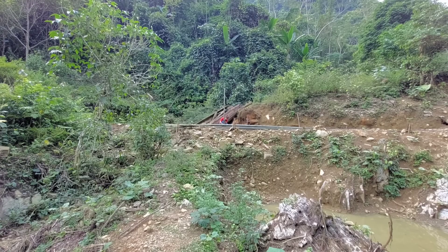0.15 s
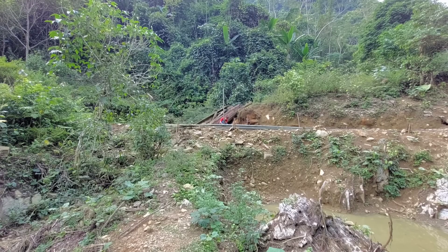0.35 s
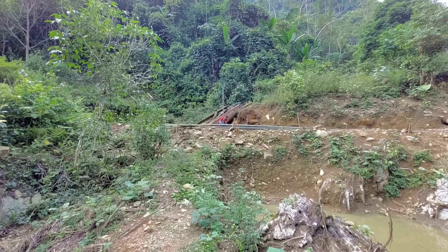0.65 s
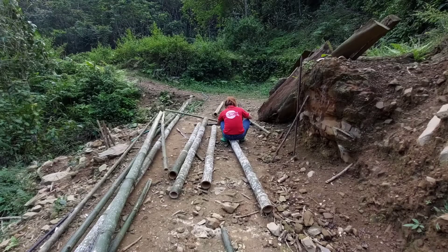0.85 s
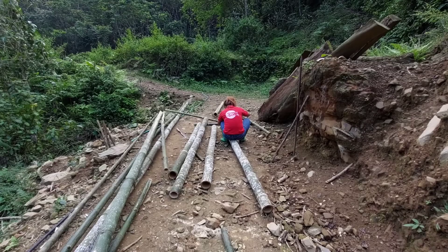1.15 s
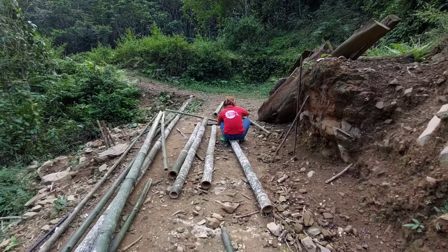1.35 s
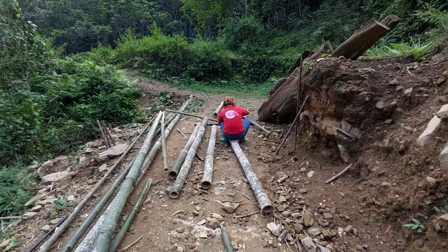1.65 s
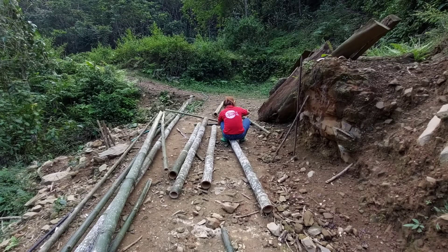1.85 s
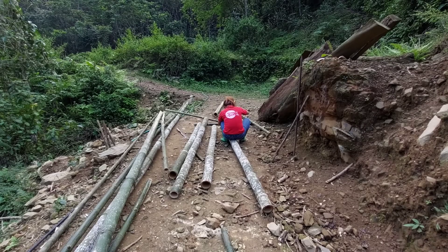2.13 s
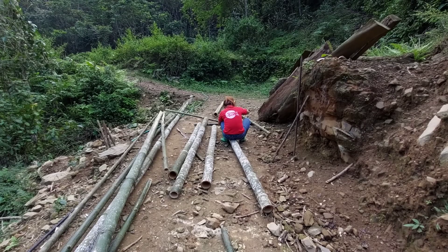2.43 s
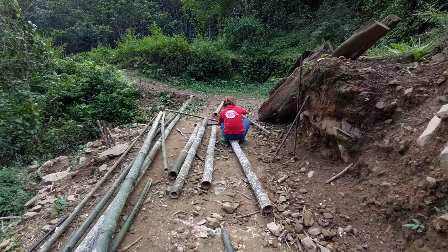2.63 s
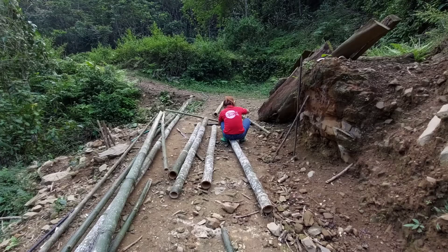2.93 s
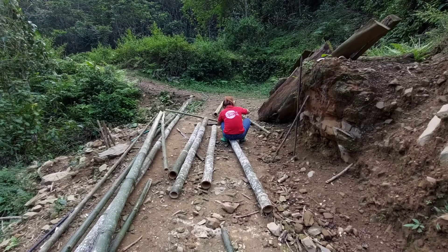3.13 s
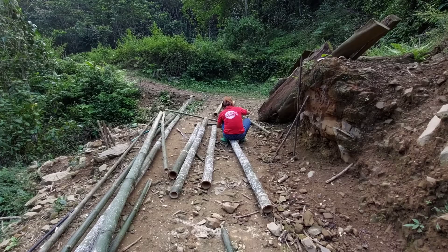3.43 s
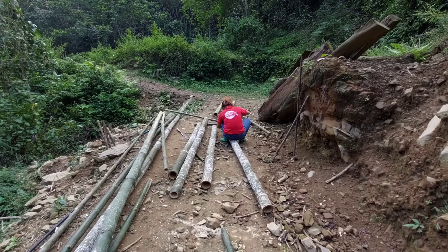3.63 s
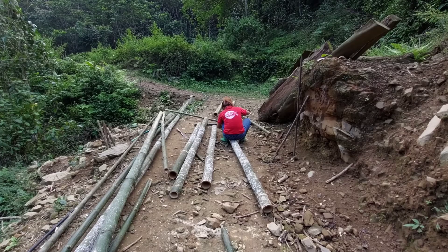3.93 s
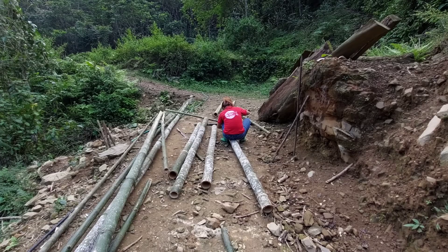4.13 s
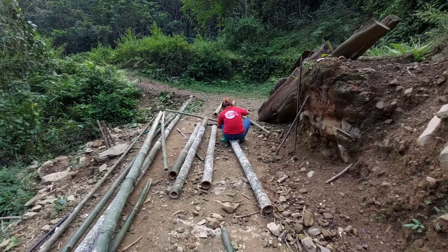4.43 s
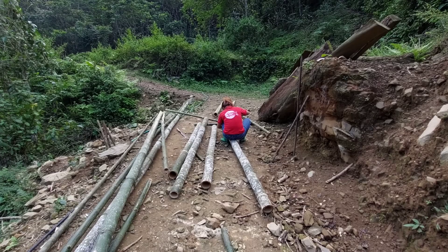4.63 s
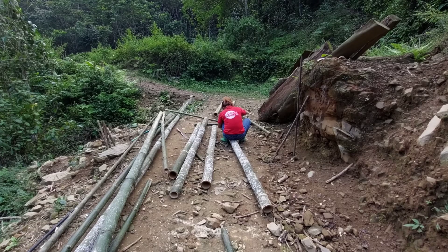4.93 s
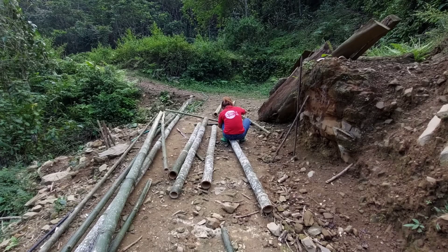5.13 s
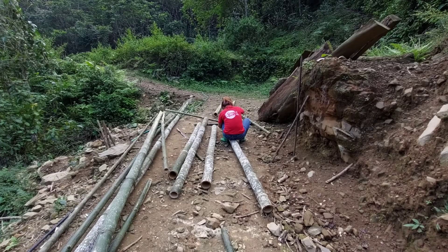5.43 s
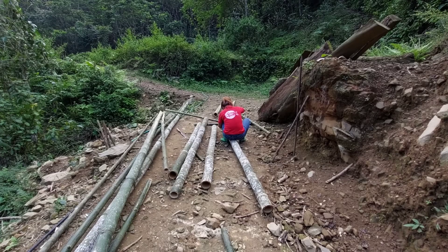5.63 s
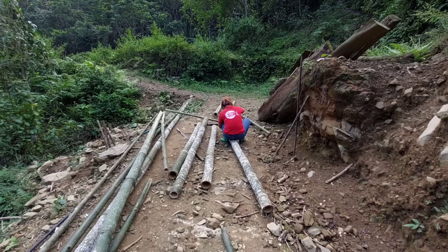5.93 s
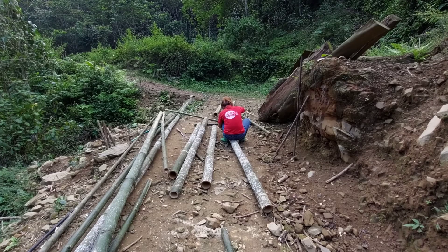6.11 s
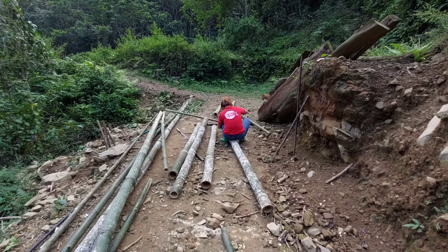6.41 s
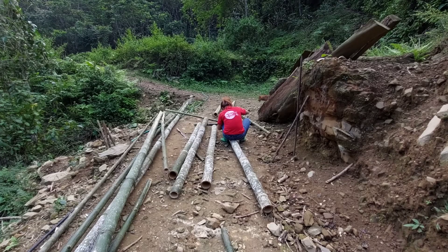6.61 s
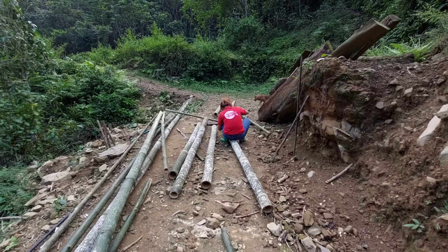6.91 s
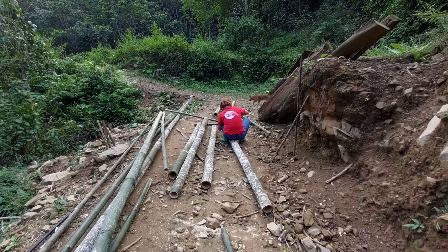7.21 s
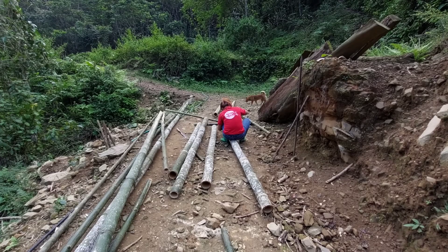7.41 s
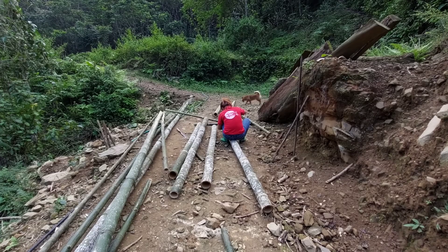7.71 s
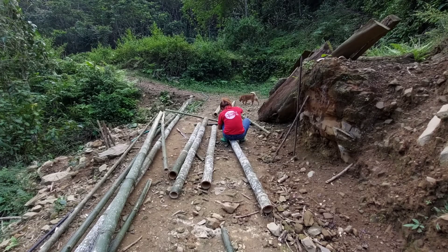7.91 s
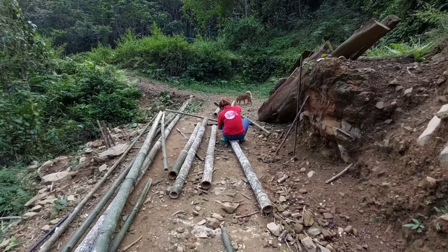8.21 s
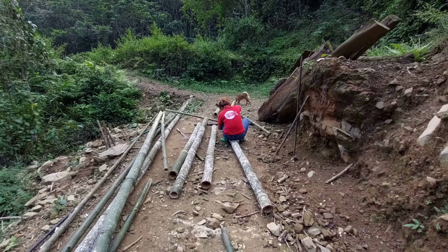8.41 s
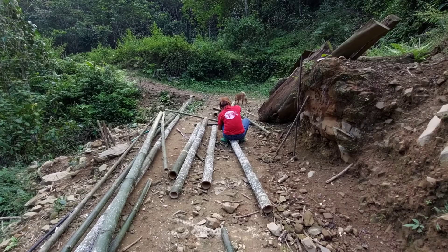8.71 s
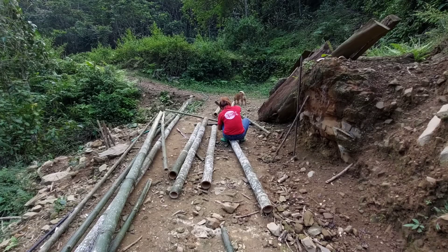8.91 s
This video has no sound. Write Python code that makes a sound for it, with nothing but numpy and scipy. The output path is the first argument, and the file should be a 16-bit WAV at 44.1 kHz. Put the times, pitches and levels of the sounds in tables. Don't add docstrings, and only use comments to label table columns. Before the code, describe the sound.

Stereo outdoor pickup from a few metres away. Stream wash and thin, high insect buzz run throughout, fuller in the first second and then softer. Irregular knocks on bamboo stand out far above them: quiet woody taps lead to gritty, sharp strokes with snapping fibres and a brief low hollow note. Small chip ticks and tool rebounds follow some hits, and the wooded slope returns a faint scattered tail. Long gaps hold only water and insects.

```python
import sys
import numpy as np
from scipy import signal
from scipy.fft import rfft, irfft
from scipy.io import wavfile
from scipy.ndimage import uniform_filter1d

SR = 44100
rng = np.random.default_rng(int(sys.argv[2]) if len(sys.argv) > 2 else 0)


def to_wav(s):
    ch = np.atleast_2d(s).T
    pcm = np.round(np.clip(ch, -1, 1) * 32767)
    wavfile.write(sys.argv[1], SR, pcm.astype(np.int16))


def amplitude_ratio(level_db):
    exponent = np.asarray(level_db, float) / 20
    return 10 ** exponent


N = 399409

# (time [s], wall peak [dB], wood level [dB], crack level over the wall [dB],
# spot on the wall [0-1])
BLOWS = [
    (1.713, -33, -13, -32, 0.11),
    (1.981, -30.5, -4, -39, 0.46),
    (2.438, -9, -12.5, -26.5, 0.18),
    (2.927, -5.5, -9.5, -15.5, 0.1),
    (5.153, -33, -8, -23, 0.08),
    (5.717, -9.5, -9.5, -25.5, .07),
    (6.231, -5.5, -8.5, -23, .07),
    (8.081, -27.5, -9, -30, 0.35),
    (8.627, -6, -13.5, -20, .49),
]
# (frequency [Hz], level [dB], 60 dB decay [s])
HOLLOW_MODES = [(148.6, -13.5, 0.53), (204.7, -24, 0.04), (250, 3.5, 1), (305, -13, .06), (360, -5.5, 0.77)]
# (frequency [Hz], level [dB], 60 dB decay [s])
WOOD_MODES = [(455, -9.5, 0.086), (459, -2.5, 0.16), (516.4, -4.5, 0.23), (628, -8.5, 0.31),
              (673.5, -3.5, 0.19), (721.6, 0.5, 0.25), (887.6, 4, 0.15), (997, 5.5, 0.12),
              (1270, -13, 0.074)]
# (frequency [Hz], width [Hz], level [dB])
WALL_STROKE = [(345.5, 55, -5), (448.3, 44, -6), (700, 60, -4.5), (961, 60, -5), (1313.7, 110, -2),
               (1624, 96, 1), (1957, 67, -3.5), (2420, 70, -12), (2740, 71, -4.5), (3040, 60, -10.5),
               (3406, 60, -7.5), (3660, 50, -16), (4110, 60, -19), (4670, 60, -18)]
# (frequency [Hz], width [Hz], level [dB])
WALL_TAP = [(335.5, 90, -5), (482, 19, -8.5), (818, 59, 2.5), (1102, 118, -0.5), (1274, 80, -7),
            (1950, 32, -38), (2770, 50, -22)]
# (time [s], peak [dB], low edge [Hz], high edge [Hz],
# fall [ms])
SMALL_BURSTS = [(1.714, -44.5, 2470, 3400, 3), (2.437, -26, 2710, 4100, 3), (2.47, -47.5, 3250, 3650, 14),
                (2.97, -46, 3170, 3650, 15), (5.156, -53, 2600, 3030, 2), (4.479, -48, 180, 320, 7.2),
                (5.77, -33.5, 600, 1100, 8.4), (5.83, -44, 215, 290, 14), (4.025, -51, 500, 800, 4),
                (2.927, -22, 2650, 3200, 2.5), (5.943, -42.5, 550, 1500, 1.7), (5.946, -55, 2000, 8000, 4.4),
                (6.35, -51, 3000, 3700, 4.4), (6.389, -56, 995, 1800, 4.4), (8.636, -18, 300, 2470, 1.4),
                (6.252, -37.5, 4000, 9100, 4.7), (8.668, -39.5, 4500, 13000, 5.6), (8.69, -44, 1710, 2620, 7.5)]
# (frequency [Hz], level per Hz [dB])
FIRST_SPOT = [(15, -52), (25, -26), (129, -4), (313, -4), (410, -1), (762, -8.5), (1850, -12.5),
              (3630, -19), (5140, -20), (5880, -24.5), (7100, -19.5), (9300, -33.5), (11800, -34),
              (15500, -32.5)]
# (frequency [Hz], level per Hz [dB])
SECOND_SPOT = [(15, -55), (25, -23), (91, -11.5), (122, -5.5), (173, -9), (221, -2.5), (297, -6.5),
               (567, -6.5), (1020, -13.5), (2010, -15), (5730, -23.5), (6730, -20), (8810, -29.5),
               (12500, -36), (15500, -34)]
# (frequency [Hz], width [Hz], level to the hiss at the first spot [dB], at the second [dB],
# throbs per second [1/s])
INSECTS = [(7000, 170, -17, -36, 28), (7070, 200, -32, -21.5, 36), (9520, 170, -34.5, -30, 20)]
# (time [s], level [dB])
HIGH_CHORUS = [(0, -75), (.7, -74), (.9, -80), (2.9, -78), (3.2, -84), (4.15, -73), (4.5, -74), (4.74, -67),
               (4.95, -74), (5.7, -89), (6.6, -82), (7.4, -77), (9.06, -79)]

STROKE_DB, NODE_DB = -20, -10
CONTACT_MS, SOFTER_MS_PER_DB = 8.6, 0.25
WALL_RING, WALL_T60_S = 1.2, 0.039
BITE_S, WAKE_S = 0.0044, 0.00072
CHATTER_DB = -24.5
GRIND_DB, TAP_GRIND_DB = -10.5, -7
CRACK_HZ, CRACK_T60_S, CHIPS_DB, CHIPS_T60_S = (2174, 6200), 0.019, -46.5, 0.17
SETTLE_S, SETTLE_PER_DB = 0.076, 0.0847
SHIFT_S, HOLLOW_DB = 4, (-21, -6.5)
THUMP_DB, THUMP_S = -47, 0.008
SLOPE_DB, SLOPE_T60_S, SLOPE_HZ = -25.5, 0.64, 601
MOVE_S, FOREST_DB = 0.86, (-59, -62.5)
LEFT_LEAD = (-5, 22)
ANSWER_DB, ANSWER_S = 5.5, 0.12
DUCK_ABOVE_DB, DUCK_DB, DUCK_WAIT_S, DUCK_HOLD_S, DUCK_SLEW_S = -9, -2.5, 0.18, 0.95, 0.18


def unit(x):
    return x / np.sqrt(np.mean(x ** 2))


def top(x, db):
    return amplitude_ratio(db) * x / np.abs(x).max()


def band(x, lo_hz, hi_hz):
    return signal.sosfilt(signal.butter(2, [lo_hz, min(hi_hz, 0.45 * SR)], "band", fs=SR, output="sos"), x)


def walk(rate):
    k = int(SR / rate)
    held = np.repeat(rng.standard_normal(N // k + 1), k)
    return 1.1 * uniform_filter1d(uniform_filter1d(held, k), k)[:N]


def ring(modes, t, spread_ms):
    hz, db, t60 = np.transpose(modes)[:, :, None]
    side = np.array([0.5, -0.5])[:, None, None]
    lag = spread_ms / 1000 * rng.uniform(-0.86, 1, hz.shape) * side
    since = np.maximum(t - spread_ms / 2000 + lag, 0)
    sign = (-1.) ** np.arange(len(hz))[:, None]
    return sign * amplitude_ratio(db - 60 * since / t60) * np.sin(2 * np.pi * hz * since)


def pole():
    out, low_thumps = np.zeros((2, N + SR)), np.zeros(N + SR)
    t = np.arange(SR // 2) / SR
    hollow, wood = body_mode(HOLLOW_MODES, t, 0.25), body_mode(WOOD_MODES, t, 0.36)
    fill = 1 - np.exp(-t / 0.006)
    u = t / THUMP_S
    thump = u * np.exp(1 - u) * np.cos(2.3 * u)
    for s, wall_db, wood_db, crack_db, spot in BLOWS:
        sink = np.exp(-(t / SETTLE_S / (1 + SETTLE_PER_DB * (wall_db + 6.5))) ** 2)
        blow = amplitude_ratio(HOLLOW_DB[int(s > SHIFT_S)]) * hollow * fill * sink
        blow += amplitude_ratio(wood_db) * wood * np.minimum(t / BITE_S, 1) * sink

        hz, width, db = np.transpose(WALL_STROKE if wall_db > STROKE_DB else WALL_TAP)
        mode_shape = np.cos(np.pi * np.arange(len(hz)) * spot) ** 2
        db = db + 10 * np.log10(mode_shape + amplitude_ratio(NODE_DB) ** 2)
        since, force = contact_force(hz, wall_db, t[:3072])
        short = wall(hz, width, db, since, force, t)
        blow[:, :short.shape[1]] += short
        grind_db = GRIND_DB + TAP_GRIND_DB * (wall_db < STROKE_DB)
        blow[:, :force.shape[1]] += top(grinding(force[len(hz) // 2]), grind_db)
        blow += top(cracks(t), crack_db + 7.5)

        start = int((s - 0.0045) * SR)
        out[:, start:start + len(t)] += amplitude_ratio(wall_db) * blow
        low_thumps[start:start + len(t)] += amplitude_ratio(wall_db + THUMP_DB) * thump
    no_bass = signal.butter(3, 110, "high", fs=SR, output="sos")
    return signal.sosfilt(no_bass, out[:, :N]) + low_thumps[:N]


def body_mode(modes, t, spread_ms):
    push = (t * np.exp(-t / 0.0005))[None]
    body = ring(modes, t, spread_ms).sum(axis=1)
    return top(signal.fftconvolve(body, push, axes=1), 0)[:, :len(t)]


def contact_force(hz, wall_db, t):
    contact_ms = CONTACT_MS - SOFTER_MS_PER_DB * wall_db
    since = np.maximum(t - WAKE_S * np.log2(hz[:, None] / 300), 0)
    grip = contact_ms / 1000 * (800 / hz[:, None]) ** 0.38
    force = np.minimum(since / BITE_S / 1.41, 1) ** 2 * np.exp(-(since / grip) ** 1.26)
    return since, force


def wall(hz, width, db, since, force, t):
    t60 = np.minimum(WALL_RING / width, WALL_T60_S * (1000 / hz) ** 1.1)
    short = ring(np.c_[hz, 0 * db, t60], t, 0.2)[:, :, :4096]
    phase = hz[:, None] * since + rng.random((len(hz), 1))
    chatter = amplitude_ratio(CHATTER_DB) * np.cos(2 * np.pi * phase)
    grit = force * (rng.standard_normal((1,) + force.shape) + 2 * chatter)
    short = signal.fftconvolve(short, grit, axes=2)
    level = amplitude_ratio(db - 0.89 * np.log2(hz / 1000)) * np.sqrt(width)
    short *= (level / np.sqrt(np.sum(short ** 2, axis=(0, 2))))[:, None]
    return top(band(short.sum(axis=1), 220, 8000), 0)


def grinding(force):
    grind = rng.standard_normal((3, len(force)))
    return band(force ** 0.84 * (grind[0] + 0.73 * grind[1:]), 470, 2300)


def cracks(t):
    bite = np.clip((t - 3.7 * WAKE_S) / BITE_S, 0, 1)
    fade = bite ** 2 * (amplitude_ratio(-60 * t / CRACK_T60_S) + amplitude_ratio(CHIPS_DB - 60 * t / CHIPS_T60_S))
    snap = rng.standard_normal((3, len(t)))
    return band(band(fade * (snap[0] + 4.2 * snap[1:]), *CRACK_HZ), 1500, 6800)


def small_bursts():
    out, t = np.zeros((2, N)), np.arange(SR // 10) / SR
    for s, db, lo_hz, hi_hz, fall_ms in SMALL_BURSTS:
        u = t / (fall_ms / 1000)
        noise = rng.standard_normal((3, len(t)))
        burst = u * np.exp(-u) * (noise[0] + 0.5 * noise[1:])
        start = int(s * SR)
        out[:, start:start + len(t)] += top(band(burst, lo_hz, hi_hz), db)
    return out


def slope(knocks):
    t = np.arange(SR // 2) / SR
    echo = rng.standard_normal((2, len(t))) * amplitude_ratio(-60 * t / SLOPE_T60_S) * np.minimum(t / 0.023, 1)
    echo = band(echo, SLOPE_HZ, 14000) + 0.62 * band(echo, 3100, 3400)
    echo /= np.sqrt(np.sum(echo ** 2) / 2)
    return amplitude_ratio(SLOPE_DB) * signal.fftconvolve(knocks, echo, axes=1)[:, :N]


def forest():
    t = np.arange(N) / SR
    gain_db, duck_db = background_gain_db(t)
    moved = np.clip((t - MOVE_S) / 0.14 + 0.5, 0, 1)
    first = hiss(FIRST_SPOT, LEFT_LEAD[0], 0.12, gusty_db=2.0)
    second = hiss(SECOND_SPOT, LEFT_LEAD[1], 0.44, gusty_db=0.63)
    second[0] -= 0.39 * signal.lfilter(*signal.butter(1, 250, fs=SR), second[0])
    out = np.sqrt(1 - moved) * first + np.sqrt(moved) * second + insects(moved)
    return amplitude_ratio(duck_db) * (out * amplitude_ratio(gain_db + 7.0) + high_chorus(t))


def hiss(colour, lead, near_share, gusty_db):
    f = np.maximum(np.fft.rfftfreq(N, 1 / SR), 1)
    hz, db = np.transpose(colour)
    alike = np.clip(near_share / (1 + f / 2500) + 0.88 / (1 + (f / 400) ** 2), 0, 1)
    stream, wash = rfft(rng.standard_normal(N)), rfft(rng.standard_normal((2, N)))
    stream = stream * np.exp(2j * np.pi * f * lead / SR * np.array([[0.5], [-0.5]]))
    mixed = np.sqrt(alike) * stream + np.sqrt(1 - alike) * wash
    shaped = amplitude_ratio(np.interp(np.log(f), np.log(hz), db)) * mixed
    out = 0
    for octave in np.arange(5, 15):
        part = shaped * np.cos(np.pi / 2 * np.clip(np.log2(f) - octave, -1, 1)) ** 2
        flicker_db = 1.16 * walk(14) + gusty_db * 6 / octave * walk(4.2)
        out = out + amplitude_ratio(flicker_db) * irfft(part, N)
    return unit(out)


def insects(moved):
    out = np.zeros((2, N))
    for hz, width_hz, first_db, second_db, rate in INSECTS:
        chorus = unit(band(rng.standard_normal((2, N)), hz - width_hz / 2, hz + width_hz / 2))
        out += amplitude_ratio(first_db + (second_db - first_db) * moved + 0.93 * walk(rate)) * chorus
    return out


def high_chorus(t):
    s, db = np.transpose(HIGH_CHORUS)
    high = unit(band(rng.standard_normal((2, N)), 10800, 13000))
    return high * amplitude_ratio(np.interp(t, s, db) - 4.5 + 1.0 * walk(13))


def background_gain_db(t):
    db = FOREST_DB[0] + (FOREST_DB[1] - FOREST_DB[0]) * np.clip((t - MOVE_S) / 0.091 + 0.5, 0, 1)
    duck = np.zeros(N)
    for s, wall_db, *_ in BLOWS:
        u = np.maximum(t - s, 0) / ANSWER_S
        db = db + (wall_db > STROKE_DB) * ANSWER_DB * np.minimum(u * 10, 1) * np.exp(-u ** 2)
        held = (t > s + DUCK_WAIT_S) * (t < s + DUCK_WAIT_S + DUCK_HOLD_S)
        duck += (wall_db > DUCK_ABOVE_DB) * DUCK_DB * held
    return db, uniform_filter1d(duck, int(DUCK_SLEW_S * SR))


def scene():
    knocks = pole() + small_bursts()
    return knocks + slope(knocks) + forest()


def band_limit(x):
    return signal.sosfilt(signal.butter(12, 15740, fs=SR, output="sos"), x)


def record(dry):
    mix = np.tanh(1.256 * dry) / 1.381
    return band_limit(mix)


dry = scene()
out = record(dry)
to_wav(out)
```